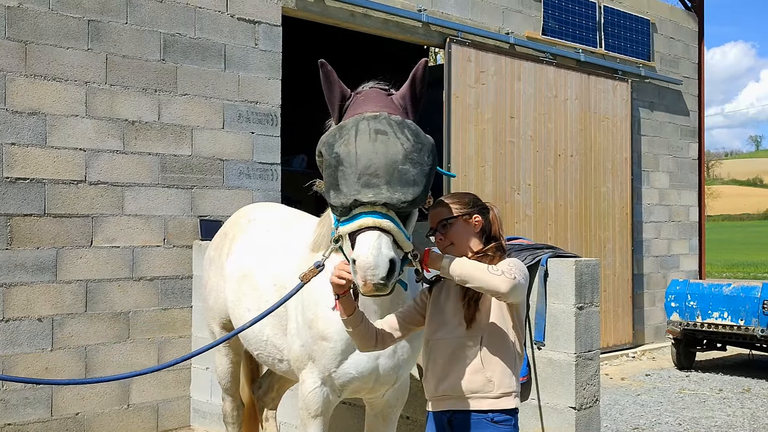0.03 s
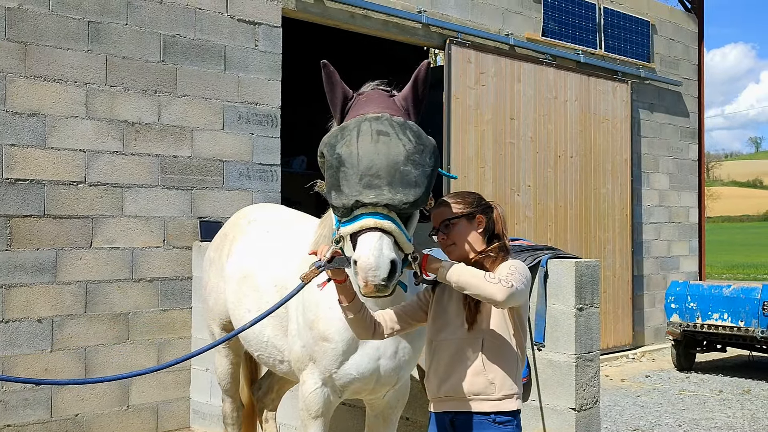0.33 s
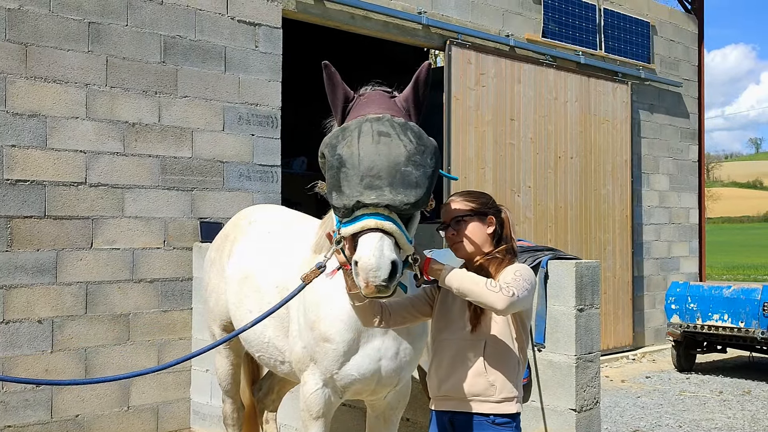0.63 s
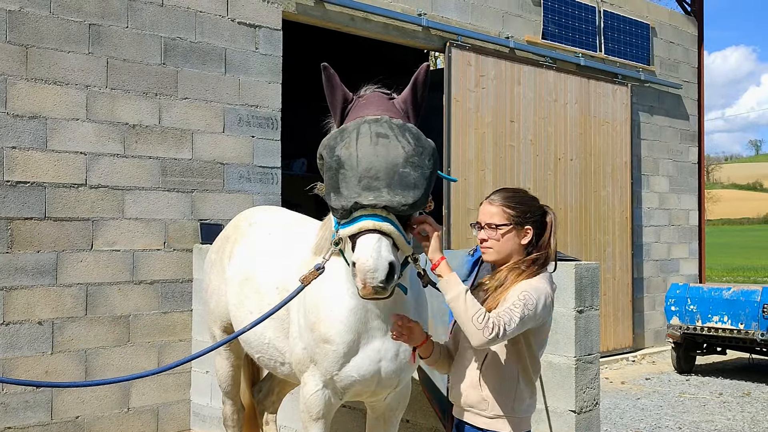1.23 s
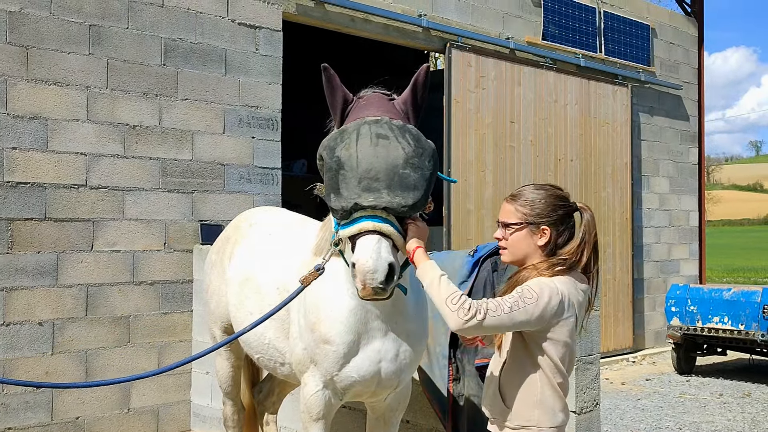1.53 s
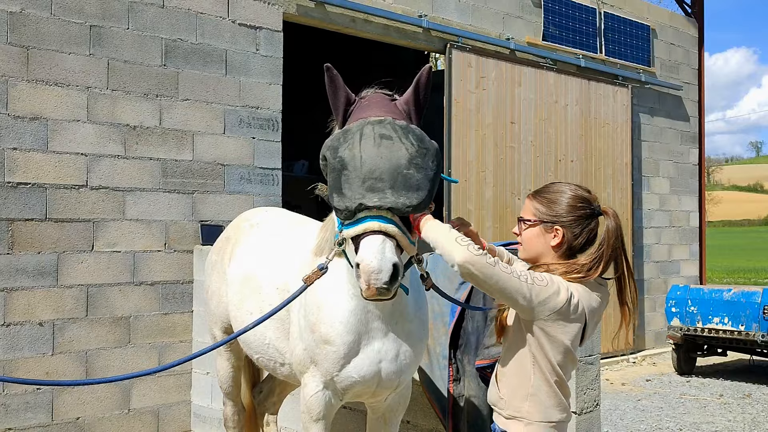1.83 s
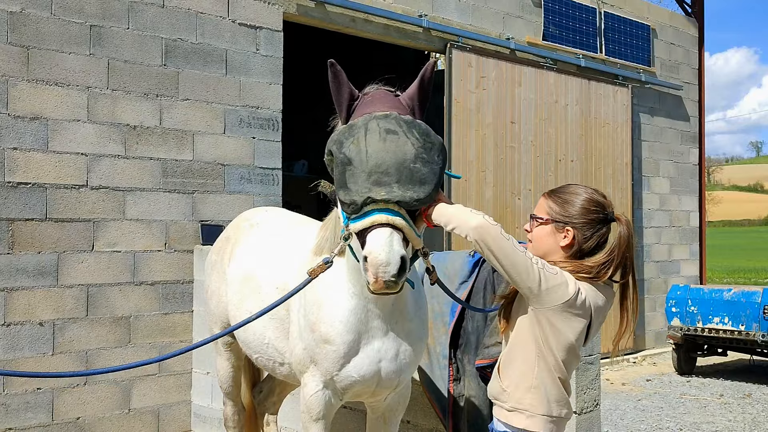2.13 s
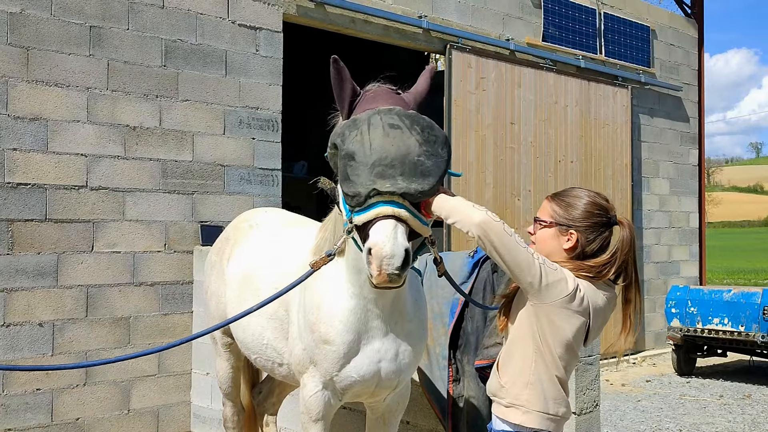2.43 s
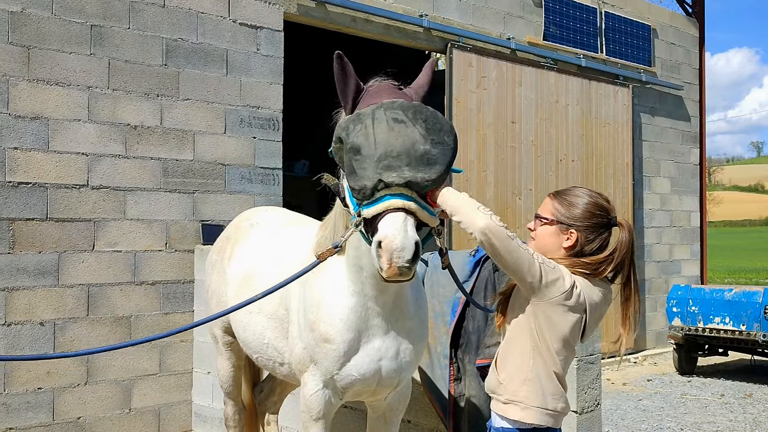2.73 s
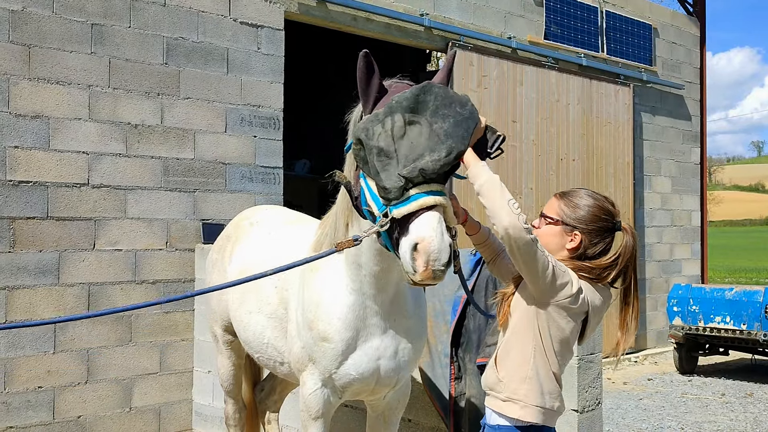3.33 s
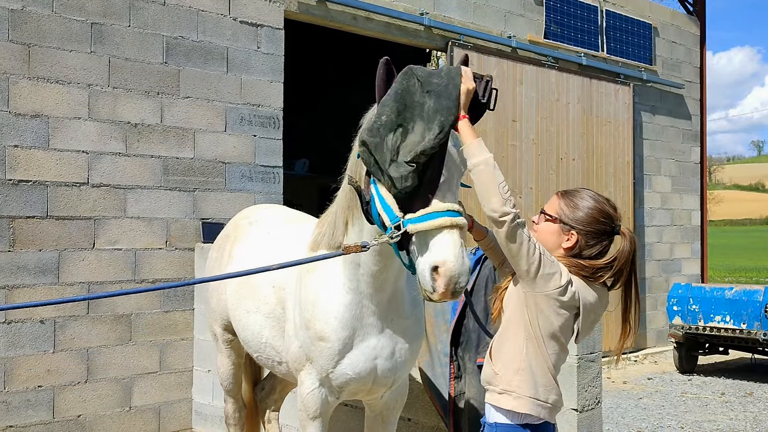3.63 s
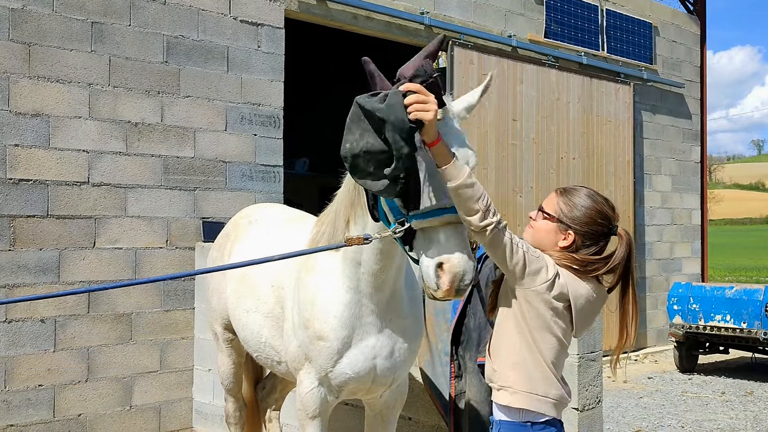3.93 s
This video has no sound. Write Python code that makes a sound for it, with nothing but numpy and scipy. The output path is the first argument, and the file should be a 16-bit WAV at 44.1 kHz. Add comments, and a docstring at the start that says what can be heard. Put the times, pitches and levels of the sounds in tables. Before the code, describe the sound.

Wind rumbles and thumps on the microphone throughout, shifting between sides, strongest around 0.5 seconds, from 1.4 to 1.8 and near 2.4. Under it, a horse's halter is handled with soft rustling: a faint clink at 0.7 seconds, then strap ticks and one short scuff between 1 and 1.7. A metal ring and buckle clink brightly around 2.6 seconds. Distant birds chirp very faintly, mostly near the end.

```python
"""Wind rumbles and thumps from side to side while a horse's halter and fly mask are handled.
Straps tick and rustle, something scuffs once, and a metal ring and buckle knock together and clink.
The rumble is the breeze hitting the microphone's two openings, buffeting each in turn.
Small birds call far off, the stable yard hisses softly, and a wall adds a short echo."""
import sys
import numpy as np
from scipy import signal
from scipy.fft import rfft, irfft
from scipy.io import wavfile

SR = 44100
rng = np.random.default_rng(int(sys.argv[2]) if len(sys.argv) > 2 else 0)


def materialize(psi):
    """Save the field psi as 16-bit PCM at rate SR to the path in sys.argv[1].

    A 1-D psi becomes a single channel; in a 2-D psi each row is a channel.
    """
    bounded = np.clip(np.atleast_2d(psi).T, -1, 1)
    quanta = np.round(bounded * 32767).astype(np.int16)
    wavfile.write(sys.argv[1], SR, quanta)


N = 176400
T = np.arange(N) / SR

# tone of the yard's hiss: pitch_hz, level_db
YARD_TONE = [(100, 8), (400, 3), (800, -1), (1400, -5.5), (3000, -9.5), (4300, -11.5), (6000, -17.5),
             (7600, -12.5), (8800, -25), (10500, -17), (12500, -12.5), (14500, -12.5)]
# bird notes: start_s, length_s, start_hz, end_hz, level_db
BIRD_NOTES = [(0.024, 0.077, 3150, 2450, -67), (0.188, 0.069, 3180, 2990, -67),
              (2.244, 0.095, 5080, 5170, -70), (3.054, .08, 3920, 3930, -65),
              (3.305, 0.1, 5100, 5080, -65.5), (3.39, .07, 5130, 5170, -68), (3.63, .08, 3910, 3895, -68),
              (3.86, 0.13, 5040, 5190, -68)]
# wind strength at each microphone opening: time_s, level_db
WIND_LEFT = [(0, -31), (.25, -24.5), (.4, -21), (.62, -27), (1.25, -24.5), (1.4, -26.5), (1.85, -29),
             (2.06, -35.5), (2.3, -23.5), (2.55, -18), (2.75, -35.5), (3.25, -32), (3.45, -23.5),
             (3.82, -33.5)]
WIND_RIGHT = [(0, -16.5), (.45, -18.5), (.58, -10.5), (.72, -21), (.92, -32.5), (1.05, -17.5),
              (1.85, -21.5), (2.2, -25.5), (2.5, -30.5), (2.66, -23.5), (3.2, -25.5), (3.6, -24),
              (4, -25.5)]
# tone of the wind's rumble: pitch_hz, level_db
RUMBLE_TONE = [(10, 9.5), (25, 5.5), (60, 8.5), (100, 2), (150, -4.5), (200, -17.5), (300, -28),
               (500, -42.5), (1000, -71), (2500, -100)]
# spells of rough air: middle_s, length_s, level_db, brightness_hz, left_minus_right_db
GUSTS = [(.09, 0.29, -33, 230, -5), (0.301, 0.17, -23, 217, -17), (.59, 0.12, -22.5, 195, -28),
         (1.07, 0.34, -35, 194, -14), (1.74, 0.59, -35.5, 173, -35), (2.49, 0.11, -18.5, 178, 25),
         (3.38, 0.61, -40.5, 204, -0.5)]
# single swirls of air hitting an opening: middle_s, level_db, brightness_hz, left_minus_right_db
BUFFETS = [(0.036, -14.5, 118, -26), (0.068, -25, 271, -23), (0.178, -16.5, 203, -29),
           (0.303, -15, 192, -37), (0.383, -19, 162, -19), (.456, -13.5, 318, -22),
           (0.462, -10.5, 201, -33), (0.535, -16, 216, -41), (.553, -12, 218, -46), (0.594, -12, 158, -42),
           (0.843, -16.5, 128, -9), (1.071, -22.5, 208, -13), (1.359, -11.5, 146, 11),
           (1.408, -9.5, 287, 32), (1.431, -16, 185, 33), (1.468, -20.5, 182, -32), (1.561, -13, 182, -32),
           (1.717, -11.5, 173, -35), (1.725, -16.5, 334, 7.5), (1.738, -13, 184, 14),
           (1.812, -17, 190, -42), (1.838, -20.5, 226, -35), (2.07, -22, 155, -32),
           (2.333, -8.5, 138.5, 26), (2.447, -18, 150, 19), (2.553, -17.5, 167, 22), (2.646, -20, 63, -12),
           (2.852, -20, 131, -11), (3.052, -21, 126, -5.5), (3.606, -23, 130, -3.5)]
# loudness of the cloth's rustle and of a hollow rubbing: time_s, level_db
RUSTLE_LEVELS = [(0, -69), (.65, -64.5), (.8, -69), (1.19, -69.5), (1.24, -63), (1.4, -62.5), (1.54, -67),
                 (1.68, -62.5), (2.0, -68), (2.58, -66), (2.66, -59.5), (2.84, -59.5), (2.98, -70.5),
                 (3.35, -62.5), (3.7, -66), (3.92, -61.5)]
RUB_LEVELS = [(.95, -69), (1.05, -60.5), (1.16, -68), (1.3, -59), (1.47, -61), (1.58, -67), (1.76, -59),
              (1.86, -54.5), (1.93, -73), (2.0, -57.5), (2.1, -80)]
# tone of that rustle and rubbing: pitch_hz, level_db
RUSTLE_TONE = [(400, 0), (1000, -1), (2800, -4.5), (4500, -6.5), (7300, -6.5), (9000, -9.5), (12000, -12.5),
               (14500, -10)]
RUB_TONE = [(400, -15.5), (750, 7.5), (950, 1), (1300, -7), (2200, -22.5)]
# tone of the scuff's rasp and of its grit: pitch_hz, level_db
RASP_TONE = [(300, -34), (600, -18), (780, 3), (1300, -3), (2050, 5), (2750, 0), (3300, -14), (8000, -27)]
GRIT_TONE = [(2000, 14.5), (3200, -10), (5000, -8), (7200, -2), (9000, -14), (11500, -7), (12900, 0),
             (14500, -11)]
# notes at which the scuffed object rings: pitch_hz, level_db
SCUFF_NOTES = [(805, 0), (1065, -3), (1476, -3), (1663, -3), (1810, -6), (1932, 2), (2102, 2), (2213, -5),
               (2545, -3), (2640, -7), (2805, -6)]
# strap and buckle ticks: start_s, level_db, decay_s
TICKS = [(1.0238, -44, 0.0022), (1.241, -40, 0.0021), (1.269, -43, 0.0014), (1.3229, -41, 0.0018),
         (1.354, -51, 0.0073), (1.527, -41.5, 0.0015), (1.5612, -29.5, 0.0028), (1.6246, -38, 0.0057),
         (1.686, -47.5, 0.0085), (2.82, -44.5, 0.0084), (2.838, -51, 0.024)]
# duller knocks: start_s, level_db, decay_s, pitch_hz
KNOCKS = [(1.023, -35, 0.0027, 930), (1.0283, -41.5, 0.0045, 2630), (1.111, -55, 0.005, 1320),
          (1.2685, -40, 0.0055, 990), (1.673, -46.5, 0.0021, 1670), (2.646, -47, 0.0055, 1710),
          (2.821, -46, 0.0058, 2960)]
# tone of a tick, a knock, and metal touching metal: pitch_hz, level_db
TICK_TONE = [(800, -7), (2500, -12.5), (4500, -10), (5900, -2.5), (7100, 2.5), (8800, -22), (10500, -0.5),
             (12500, -39), (14500, 2)]
KNOCK_TONE = [(300, 6), (800, 10.5), (2800, -4.5), (4000, -6), (7000, -16), (14000, -33)]
CONTACT_TONE = [(1500, -20), (4300, -11), (5500, 8), (6500, -4), (7700, -4.5), (9000, -9), (11000, 3),
                (14000, -16.5)]
# notes of the ring and buckle: pitch_hz, level_db, fade_s (to fall 60 dB), left_minus_right_db
RING_NOTES = [(5491, 0, .33, 8), (5508, -13, .34, -5), (10195, -12, .42, -5), (10914, -17.5, .38, -3)]
BUCKLE_NOTES = [(5245, -6, .36, 0), (5620, 0, .08, -2), (10630, 0, .2, -3), (10735, -1, .15, -4),
                (11243, -1.5, .27, -3)]
# ring and buckle meet: start_s, ring_db, buckle_db, free_share (of the full fade time), tick_db
CLINKS = [(0.617, -65, -59, .7, -52), (0.671, -47, -54.5, 0.2, -46), (0.679, -68, -55, 0.5, -50),
          (2.618, -40, -49, 0.7, -37), (2.628, -30.5, -55, 0.45, -45), (2.641, -34.5, -60, 0.42, -54),
          (2.703, -42.5, -53.5, 0.8, -62), (2.878, -54, -58, 0.22, -58)]


def gain(db):
    """Turn decibels into a multiplier."""
    return 10 ** (np.asarray(db) / 20)


def unit(x):
    """Scale a sound to an average strength (rms) of 1."""
    return x / np.sqrt(np.mean(x ** 2) + 1e-20)


def fade(t, fade_s):
    """A smooth fall of 60 dB every fade_s."""
    return np.exp(-np.log(1000) * t / fade_s)


def loudness(rows):
    """Gain over time from rows of time_s, level_db."""
    return gain(np.interp(T, *np.array(rows).T))


def tone(rows):
    """Gain at any pitch from rows of pitch_hz, level_db."""
    hz, db = np.array(rows).T
    return lambda f: gain(np.interp(np.log(f), np.log(hz), db))


def noise(shape, size=N):
    """Noise of strength 1; shape gives the gain at each pitch."""
    f = np.maximum(np.fft.rfftfreq(size, 1 / SR), 1)
    return unit(irfft(rfft(rng.standard_normal(size)) * shape(f), size))


def wander(rate_hz, size=N):
    """A smooth random drift of strength 1."""
    return noise(lambda f: np.exp(-(f / rate_hz) ** 2), size)


def flutter(depth_db, rate_hz, size=N):
    """A gain that wobbles at random."""
    return gain(depth_db * wander(rate_hz, size))


def pan(x, side_db):
    """Move a sound left (plus) or right (minus) by turning the other side down."""
    return gain([[min(side_db, 0)], [min(-side_db, 0)]]) * x


def wide_noise(rows, width_db):
    """Noise that differs between left and right, less so above 7700 Hz."""
    side = signal.lfilter(*signal.butter(2, 7700, fs=SR), noise(tone(rows)))
    return noise(tone(rows)) + gain(width_db) * side * np.array([[1], [-1]])


def add(out, x, start_s):
    """Mix x into out from a start time."""
    i = int(round(start_s * SR))
    a, b = max(i, 0), min(i + x.shape[-1], N)
    out[..., a:b] += x[..., a - i:b - i]


def add_around(out, x, middle_s):
    """Mix x into out, centred on a time."""
    add(out, x, middle_s - x.shape[-1] / SR / 2)


def swell(shape, length_s, size=32768):
    """Noise that rises to a strength near 1 at its middle, then falls."""
    bell = np.exp(-2 * ((T[:size] - size / SR / 2) / length_s) ** 2)
    return unit(noise(shape, size) * bell) * np.sqrt(np.mean(bell ** 2))


def snap(shape, decay_s, size=4096):
    """A sudden burst of noise that dies away."""
    fall = np.exp(-T[:size] / decay_s)
    return unit(noise(shape, size) * fall) * np.sqrt(np.mean(fall ** 2))


def yard():
    """The faint, steady hiss of the open yard."""
    return gain(-60.5) * wide_noise(YARD_TONE, width_db=0.5)


def birds():
    """Thin, sliding whistles from far away."""
    out = np.zeros((2, N))
    for start_s, length_s, start_hz, end_hz, db in BIRD_NOTES:
        progress = np.linspace(0, 1, int(length_s * SR))
        hz = start_hz + (end_hz - start_hz) * progress + 14 * wander(rate_hz=90)[:len(progress)]
        whistle = np.sin(2 * np.pi * np.cumsum(hz) / SR)
        add(out, gain(db) * np.sin(np.pi * progress) * whistle, start_s)
    return out


def air_tone(hz, slope=3.72, bass_share=0.3):
    """Tone of swirling air: even from bass_share * hz up to hz, then steeply weaker."""
    return lambda f: f ** 2 / (f ** 2 + (bass_share * hz) ** 2) / np.sqrt(1 + (f / hz) ** (2 * slope))


def buffet(hz, swirl_cycles=4, size=8192):
    """One kick of air pressure inside a short ragged swirl, quicker when brighter."""
    bell = np.exp(-2 * ((T[:size] - size / SR / 2) * hz / swirl_cycles) ** 2)
    kick_tone = air_tone(hz)(np.fft.rfftfreq(size, 1 / SR))
    kick = np.fft.fftshift(irfft(kick_tone * np.exp(2j * np.pi * rng.random())))
    swirl = flutter(depth_db=3, rate_hz=hz, size=size) * noise(air_tone(hz * 0.76), size) * bell
    return unit(unit(kick) + gain(-1) * unit(swirl)) * np.sqrt(np.mean(bell ** 2))


def wind():
    """Air rumbles separately on each microphone opening, with brighter gusts and thumps."""
    out = np.zeros((2, N))
    for opening, levels in zip(out, (WIND_LEFT, WIND_RIGHT)):
        rumble = noise(tone(RUMBLE_TONE)) * loudness(levels)
        opening += rumble * unit(flutter(depth_db=3, rate_hz=10.8))
    for middle_s, length_s, db, hz, side_db in GUSTS:
        shape = air_tone(hz, slope=4.26, bass_share=0.11)
        gust = np.array([swell(shape, length_s, size=65536) for _ in range(2)])
        gust *= unit(flutter(depth_db=2, rate_hz=30))[:gust.shape[1]]
        add_around(out, pan(gain(db) * gust, side_db), middle_s)
    for middle_s, db, hz, side_db in BUFFETS:
        thump = np.array([buffet(hz), buffet(hz)])
        add_around(out, pan(gain(db) * thump, side_db), middle_s)
    return out


def rustle():
    """Cloth and webbing catch and slide in tiny uneven steps, over a soft hollow rubbing."""
    grain = unit(flutter(depth_db=2.2, rate_hz=250) * flutter(depth_db=1.2, rate_hz=25))
    wobble = unit(flutter(depth_db=3, rate_hz=28))
    cloth = wide_noise(RUSTLE_TONE, width_db=-6) * grain * loudness(RUSTLE_LEVELS)
    rubbing = wide_noise(RUB_TONE, width_db=-6) * wobble * loudness(RUB_LEVELS)
    return cloth + rubbing


def scuff(start_s=1.197, rise_s=.011, hold_s=.012, fall_s=.006):
    """A surface sticks and slips in one short, gritty rasp that makes a hollow object ring."""
    out = np.zeros((2, N))
    t = T[:SR // 4]
    pressure = np.interp(t, np.cumsum([0, rise_s, hold_s, fall_s]), [0, 1, 1, 0])
    slips = flutter(depth_db=3, rate_hz=400, size=len(t))
    rasp = unit(noise(tone(RASP_TONE), len(t)) * slips * pressure) * np.std(pressure)
    for side in out:
        notes = sum(gain(db) * np.cos(2 * np.pi * hz * t + rng.standard_normal())
                    for hz, db in SCUFF_NOTES)
        ringing = signal.fftconvolve(rasp, notes * fade(t, fade_s=.06))[:len(t)]
        ringing = gain(-4) * unit(ringing) * np.std(rasp)
        add(side, gain(-38.5) * (rasp + ringing), start_s)
    grit = gain(-41) * swell(tone(GRIT_TONE), length_s=0.024)
    add_around(out, grit, start_s + rise_s + hold_s)
    return out


def straps():
    """Fastenings tick sharply and give duller knocks, each knock boosted around its own pitch."""
    out = np.zeros((2, N))
    for start_s, db, decay_s in TICKS:
        add(out, pan(gain(db) * snap(tone(TICK_TONE), decay_s), side_db=-5), start_s)
    for start_s, db, decay_s, hz in KNOCKS:
        boost = lambda f: 1 + gain(21.5) / (1 + ((f - hz) / (0.17 * hz)) ** 2)
        knock = snap(lambda f: tone(KNOCK_TONE)(f) * boost(f), decay_s)
        add(out, pan(gain(db) * knock, side_db=-3.5), start_s)
    return out


def strike(free_share, rise_s=0.004, touches_per_s=220, free_chatter_s=.11):
    """One push, then faint chatter as loose metal settles, longer when it hangs free."""
    t = T[:SR // 2]
    push = np.exp(-t / rise_s) / (rise_s * SR)
    touches = rng.random((2, len(t))) < touches_per_s / SR
    phases = np.exp(2j * np.pi * rng.random(touches.shape))
    settling = np.exp(-t / (free_chatter_s * free_share))
    return push + gain(-17) * touches * phases * settling


def clinks():
    """Ring and buckle meet with a tick and ring on; chatter roughens the notes, fingers damp them."""
    out = np.zeros((2, N))
    for part, notes in enumerate((RING_NOTES, BUCKLE_NOTES)):
        for hz, note_db, fade_s, side_db in notes:
            vibration = np.zeros((2, N), complex)  # the note's strength and phase over time
            for start_s, *part_db, free_share, _ in CLINKS:
                kept_per_sample = fade(1 / SR, fade_s * free_share)
                ringing = signal.lfilter([1], [1, -kept_per_sample], strike(free_share))
                add(vibration, gain(part_db[part] + note_db) * ringing, start_s)
            note = vibration * np.exp(2j * np.pi * (hz * T + rng.random()))
            out += pan(note.real, side_db)
    for start_s, *_, tick_db in CLINKS:
        tick = snap(tone(CONTACT_TONE), decay_s=0.0075)
        add(out, pan(gain(tick_db) * tick, side_db=-3), start_s)
    return out


def wall_echo(sound, delay_s=.008):
    """The stable wall throws back a short, blurred echo."""
    t = T[:SR // 2]
    tail = rng.standard_normal((2, len(t))) * fade(t, fade_s=.2) * (t > delay_s)
    tail /= np.sqrt(np.sum(tail ** 2, axis=1, keepdims=True))
    return gain(-16) * signal.fftconvolve(sound, tail, axes=1)[:, :N]


def scene():
    """The halter and birds with their echo, plus rustle, hiss and wind."""
    direct = clinks() + straps() + scuff() + birds()
    return direct + wall_echo(direct) + rustle() + yard() + wind()


def record(dry, ease_s=.004, top_hz=14250):
    """Fade both ends briefly and cut the highest treble."""
    ease = np.minimum(1, np.minimum(T, T[::-1]) / ease_s)
    treble_cut = signal.ellip(10, .2, 80, top_hz, fs=SR, output="sos")
    return signal.sosfilt(treble_cut, dry * ease)


dry = scene()
out = record(dry)
materialize(out)
```